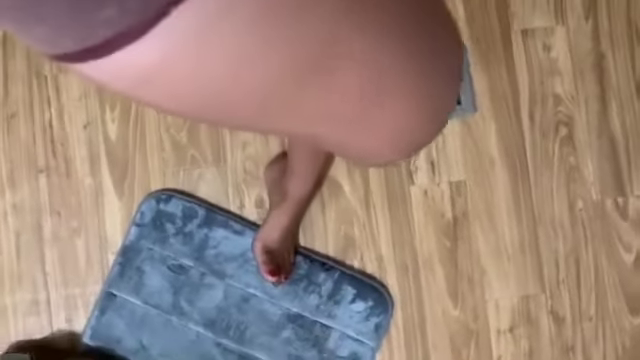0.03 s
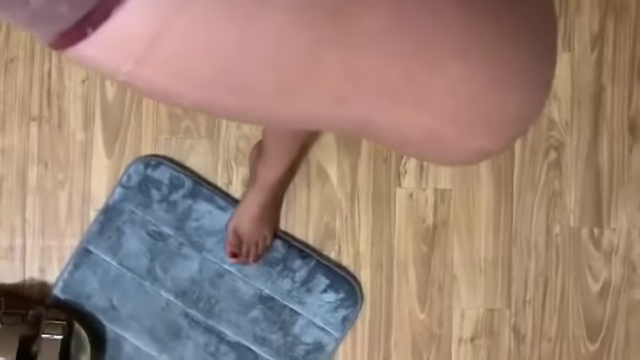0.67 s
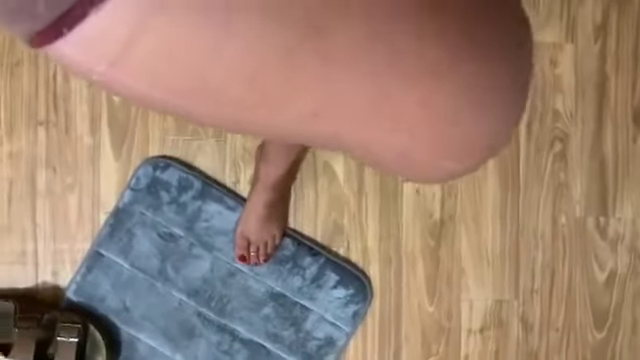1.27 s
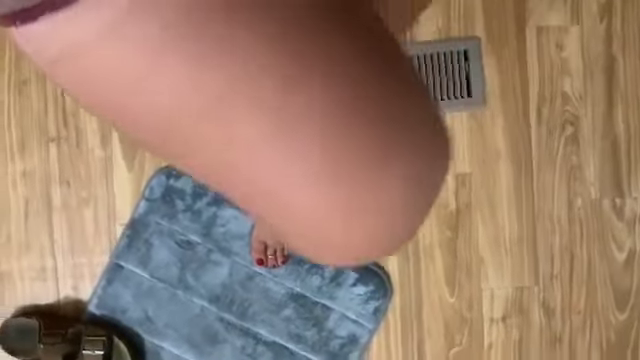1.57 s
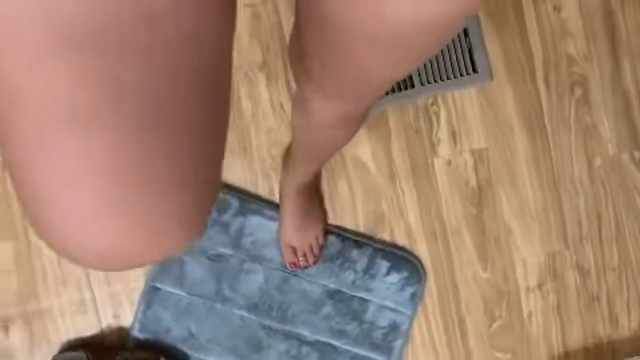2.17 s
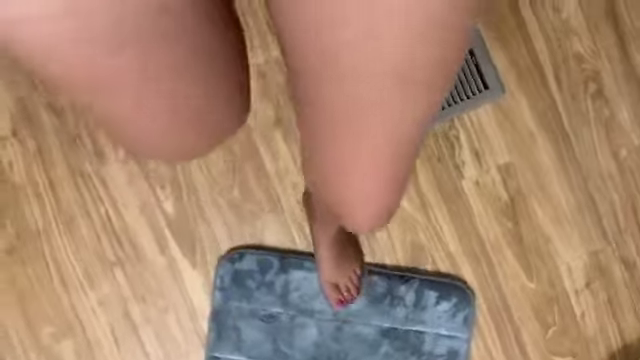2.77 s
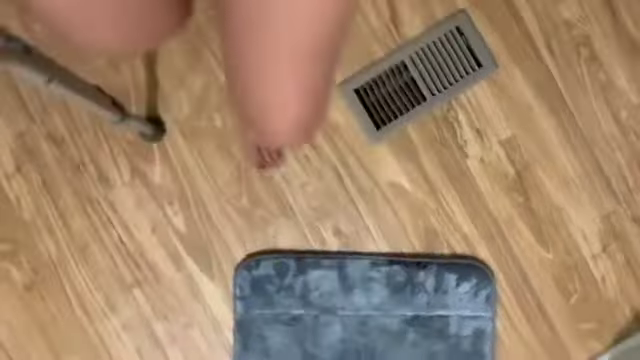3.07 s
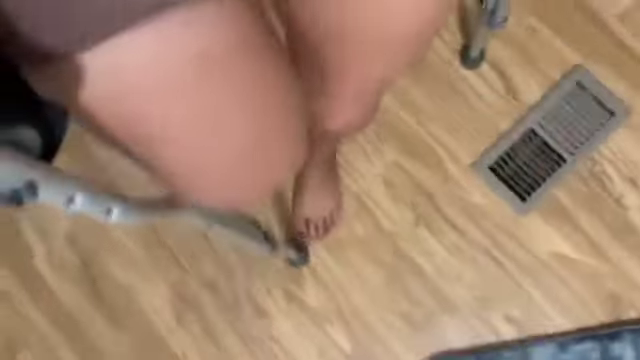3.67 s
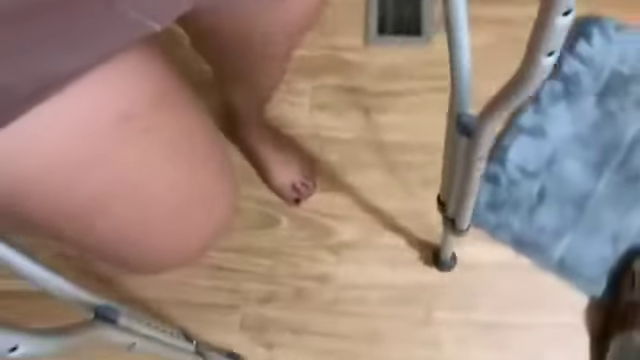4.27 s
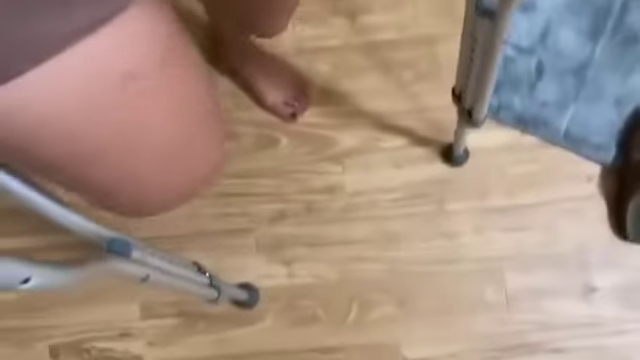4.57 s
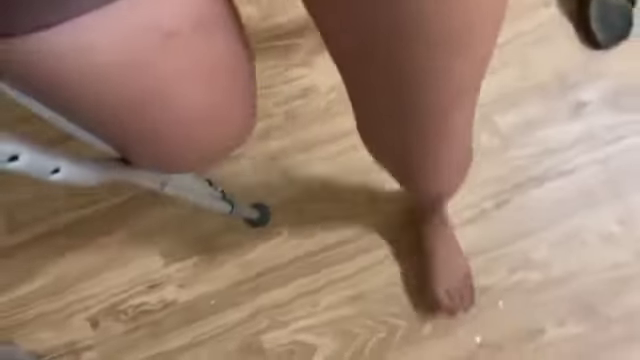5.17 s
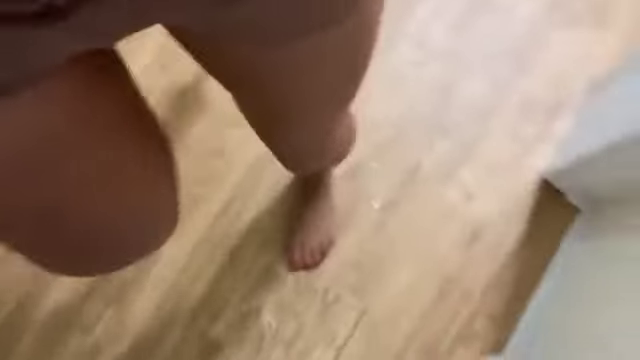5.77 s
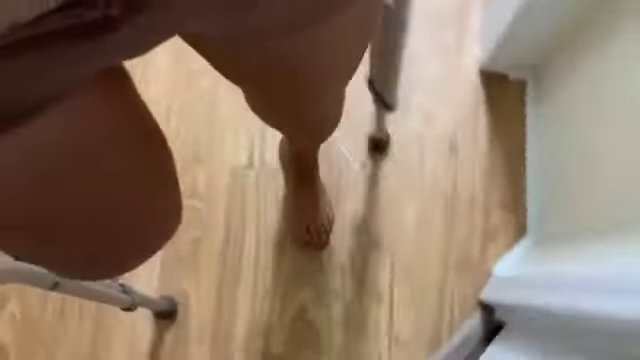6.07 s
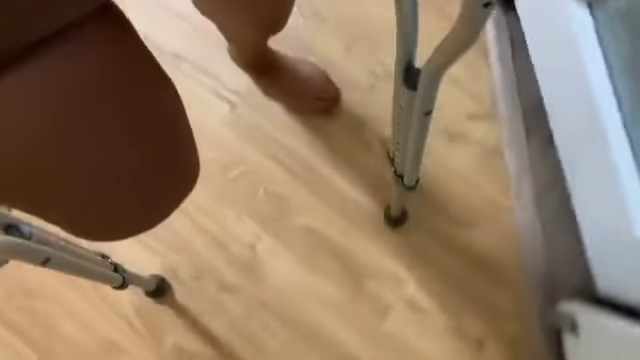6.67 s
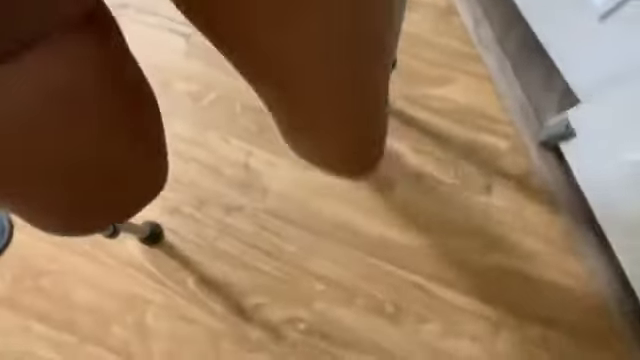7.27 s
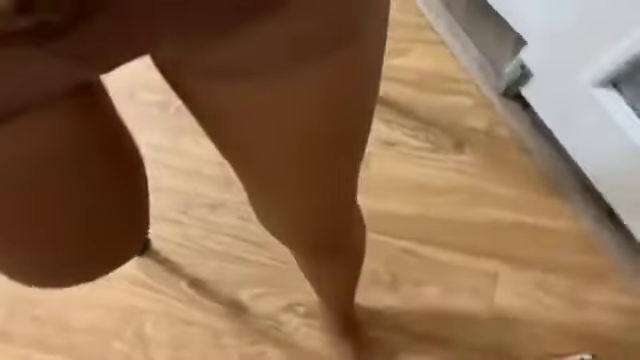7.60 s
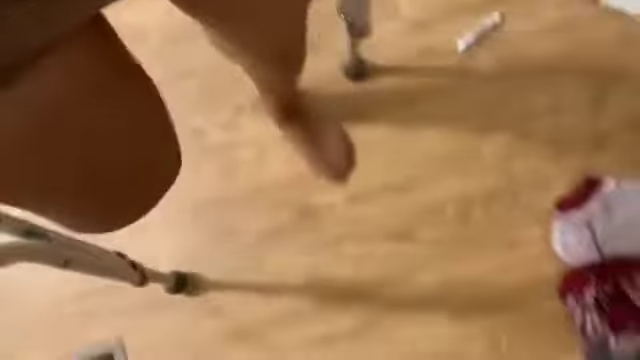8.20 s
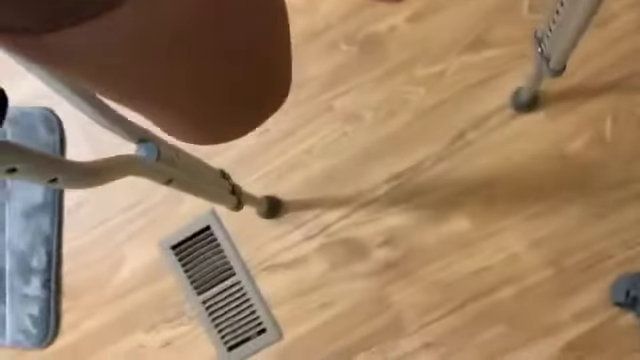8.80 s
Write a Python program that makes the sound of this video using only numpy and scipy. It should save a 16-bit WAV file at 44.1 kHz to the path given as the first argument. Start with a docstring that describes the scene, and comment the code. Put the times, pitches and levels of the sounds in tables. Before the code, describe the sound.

Someone moves on two metal crutches and one bare foot across a laminate floor in a small, hard room. At first there are only faint clothing swishes, a soft thud and small creaks. Then loose tubes clack, rubber tips thump and rattle on the boards, and the foot pats down. Two short high squeaks come in the second half. The microphone is close against the body, over a low ventilation hum.

```python
"""A small hard room with a laminate floor, over a low ventilation hum. Someone hops across it on one bare
foot and two aluminium crutches, heard from a phone held against the body. Clothes swish with each swing
and the pads rub and joints creak under load. The foot and the rubber tips knock on the boards and set
the joists booming; the loose telescoping tubes clack and squeak as they are lifted."""
import sys
import numpy as np
from scipy import signal
from scipy.fft import rfft, irfft, next_fast_len
from scipy.io import wavfile
from scipy.ndimage import uniform_filter1d

SR = 44100
rng = np.random.default_rng(int(sys.argv[2]) if len(sys.argv) > 2 else 0)


def bounce(signal):
    """Save signal as a 16-bit WAV file at the path given by the first command-line argument."""
    frames = np.transpose(np.atleast_2d(signal))
    limited = np.clip(frames, -1, 1)
    pcm = np.round(limited * 32767).astype(np.int16)
    wavfile.write(sys.argv[1], SR, pcm)


N = 389844
TIME = np.arange(N) / SR

# a soft rubber tip, which passes little treble: f/Hz, level/dB
RUBBER_EQ = [(300, 9.5), (2000, -2.5), (3500, -13.5), (7000, -36), (13000, -19)]
# bright rattle of loose joints: f/Hz, level/dB
RATTLE_EQ = [(300, -35), (1200, 8), (2100, 8.5), (3300, 5), (4500, 3), (5600, 3), (7200, 6.5), (9400, -1),
             (11300, -6), (13200, -24)]
# metal on metal: f/Hz, level/dB
METAL_EQ = [(500, 1.5), (1600, 6), (2100, 2.5), (2900, -1.5), (4400, 1.5), (5600, 16), (7000, -20),
            (8400, 15), (9600, -4), (11500, -4), (13500, -14)]
# dry snap of a joint or a fold of cloth: f/Hz, level/dB
SNAP_EQ = [(200, 11), (700, 14.5), (1350, -0.5), (1900, 11.5), (2250, 1.5), (2700, 6.5), (3300, -10.5),
           (6000, -18.5), (9000, -25), (13000, -46)]


def undb(db):
    """Decibels to gain."""
    return 10 ** (np.asarray(db) / 20)


def along(points, hz):
    """Read a curve of (f/Hz, value) points on a log-frequency axis."""
    f, value = np.transpose(points)
    return np.interp(np.log(np.maximum(hz, 1)), np.log(f), value)


def colour(x, eq):
    """Shape a sound with an EQ curve of (f/Hz, level/dB) points."""
    size = next_fast_len(x.shape[-1] + SR // 20)
    gain = undb(along(eq, np.fft.rfftfreq(size, 1 / SR)))
    return irfft(rfft(x, size) * gain, size)[..., :x.shape[-1]]


def unit(x):
    """Scale to rms 1."""
    return x / np.sqrt(np.mean(x ** 2))


def crest(x):
    """Scale a hit so that its loudest 5 ms have rms 1."""
    return x / np.sqrt(uniform_filter1d(x ** 2, size=220).max())


def wander(rate_hz, size=N):
    """Smooth random modulation with a spread near 1."""
    knots = rng.standard_normal(size=8192)
    return 1.24 * np.interp(TIME[:size] * rate_hz, np.arange(len(knots)), knots)


def add(track, s, x):
    """Mix a sound into a track at s seconds."""
    i = int(s * SR)
    track[i:i + len(x)] += x[:max(N - i, 0)]


def contact(decay_ms, eq=None, rise_ms=0.43, grain_db=3):
    """A burst of uneven micro-impacts that builds up and dies away as two surfaces settle."""
    ms = TIME[:SR // 2] * 1e3
    grains = rng.standard_normal(len(ms)) * undb(grain_db * wander(2500, size=len(ms)))
    if eq is not None:
        grains = colour(grains, eq)
    return grains * (1 - np.exp(-(ms / rise_ms) ** 2)) * np.exp(-ms / decay_ms)


def ring(push, modes, detune_share=0.0033):
    """Damped modes driven by a contact; each hit excites them a little differently."""
    t = TIME[:len(push)]
    body = 0
    for hz, t60, db in modes:
        detune, strength_db = rng.standard_normal(2)
        envelope = undb(db + strength_db - 60 * t / t60)
        body = body + envelope * np.cos(2 * np.pi * hz * (1 + detune_share * detune) * t)
    return crest(signal.fftconvolve(push, body)[:len(push)])


def stereo(mid, side):
    """Left and right from mid and side: the bass stays central, the midrange is wide."""
    # stereo width: f/Hz, side minus mid/dB
    width = [(60, -11), (170, -10.5), (360, -6), (660, 0.5), (1200, 1), (2300, 0.5), (3600, -0.5),
             (5000, -2.5), (7200, -2.5), (9500, 8.5), (12000, -6)]
    power_ratio = [(hz, undb(db) ** 2) for hz, db in width]
    mid = colour(mid, [(hz, -10 * np.log10(1 + r)) for hz, r in power_ratio])
    side = colour(side, [(hz, -10 * np.log10(1 + 1 / r)) for hz, r in power_ratio])
    return np.array([mid + side, mid - side])


def room_tail(t60_share):
    """Diffuse ringing of the room, of unit energy; the top end dies first."""
    # reverb time: f/Hz, t60/s
    decay = [(80, 0.44), (250, 0.61), (700, 0.43), (2000, 0.66), (4000, 0.6), (7000, 0.51), (12000, 0.17)]
    t = TIME[:SR * 3 // 4]
    hz = np.fft.rfftfreq(len(t), 1 / SR)
    noise = rfft(rng.standard_normal(len(t)))
    centres = np.geomspace(80, 12000, 9)
    tail = 0
    for f, share in zip(centres, np.eye(len(centres))):
        band = irfft(noise * along(np.c_[centres, share], hz), len(t))
        tail = tail + band * undb(-60 * t / (t60_share * along(decay, f)))
    tail = tail * (1 - np.exp(-t / 0.00086))
    return tail / np.linalg.norm(tail)


def in_room(x, tail_db, t60_share=1):
    """Direct sound, a few near reflections that comb it, then the tail."""
    # reflections off legs, floor and doors: delay/ms, mid gain, side gain
    echoes = [(.35, 0.11, 0.014), (.9, -0.011, -0.25), (2.3, -0.13, 0.056), (4.1, 0.11, 0.75),
              (6.4, 0.15, -0.023), (9.3, -0.23, 0.62), (13.1, 0.23, 0.43)]
    mid, side = (undb(tail_db) * signal.fftconvolve(x, room_tail(t60_share))[:N] for _ in range(2))
    add(mid, 0, 0.74 * x)
    for ms, mid_gain, side_gain in echoes:
        add(mid, ms / 1e3, mid_gain * x)
        add(side, ms / 1e3, side_gain * x)
    return stereo(mid, side)


def ventilation(air_db=-56, hum_hz=81, drift_hz=5, waver_db=4.5):
    """Steady duct air, and a low wavering hum that grows as the walker crosses the room."""
    # rush of duct air: f/Hz, level/dB
    air_eq = [(15, -66), (25, -5.5), (81, 7.5), (130, -2.5), (164, -3.5), (244, -8), (270, -13),
              (361, -11.5), (578, -22.5), (1780, -29.5), (2630, -28.5), (3080, -54.5), (13000, -52)]
    # swell of the hum: t/s, level/dB
    swell = [(0, -92), (3, -67.5), (5, -61.5), (6.5, -57.5), (8.84, -57)]
    air = unit(stereo(*colour(rng.standard_normal((2, N)), air_eq)))
    phase = 2 * np.pi * np.cumsum(hum_hz + drift_hz * wander(15)) / SR
    hum_db = np.interp(TIME, *np.transpose(swell)) + waver_db * wander(12)
    return undb(air_db) * air + undb(hum_db) * np.sqrt(2) * np.sin(phase)


def stroke(start, length, attack_s, release_s):
    """Envelope of one sliding move: it swells smoothly, holds and dies away."""
    swell = .5 + .5 * np.tanh((TIME - start - attack_s) / (2 * attack_s))
    return swell * np.exp(-np.maximum(TIME - start - length, 0) / release_s)


def friction(eq, band_hz, patchy_db, grain_db, slips_per_s=400, slip_db=-3):
    """Fabric catching and letting go: patches of fine grains and sudden slips, rms 1 within band_hz."""
    catch = undb(patchy_db * np.minimum(wander(45), 1.6))
    grains = unit(undb(grain_db * wander(800)) * rng.standard_normal(N))
    slipping = rng.random(N) < slips_per_s / SR
    spread_db = 4 * np.clip(rng.standard_normal(N), -2, 2)
    slips = unit(slipping * undb(spread_db)) * rng.choice([-1, 1], N)
    rub = in_room(colour(catch * (grains + undb(slip_db) * slips), eq), tail_db=-5.5)
    band = signal.sosfilt(signal.butter(4, band_hz, "bandpass", fs=SR, output="sos"), rub)
    return rub / band.std()


def crinkles(per_s=41, spread_db=3, decay_s=0.0025):
    """Folds of cloth snapping at random moments, rms 1."""
    pops = (rng.random(N) < per_s / SR) * undb(spread_db * rng.uniform(-1.7, 1, N))
    envelope = signal.lfilter([1], [1, -np.exp(-1 / (decay_s * SR))], pops)
    bursts = envelope * rng.standard_normal(N)
    return unit(in_room(colour(bursts, SNAP_EQ), tail_db=-13.5))


def clothes(rest_swish_db=-84.5, rest_fibre_db=-86):
    """Loose fabric, never quite at rest, swishes and crinkles with each move while its fibres hiss."""
    # cloth sliding over a limb: t/s, length/s, swish/dB, fibre hiss/dB
    moves = [(0, 0.25, -67, -66), (0.425, 0.2, -68, -67.5), (0.795, 0.034, -76, -100),
             (1.416, 0.14, -69, -64), (1.643, 0.24, -68.5, -74), (1.895, 0.3, -69.5, -72.5),
             (2.713, 0.28, -67, -75), (2.92, 0.22, -64.5, -77), (3.167, 0.16, -69, -75),
             (3.355, 0.096, -62, -82), (3.472, 0.1, -60, -62.5), (3.712, 0.26, -61.5, -65),
             (3.862, 0.062, -50, -53), (4.66, 0.36, -64.5, -70.5), (5.086, 0.33, -58.5, -71.5),
             (5.307, 0.23, -67, -69), (5.701, 0.15, -64, -65.5), (5.883, 0.19, -55.5, -61.5),
             (6.167, 0.066, -60.5, -41.5), (6.285, 0.037, -50.5, -73), (6.67, 0.078, -63.5, -70.5),
             (6.901, 0.14, -58, -58), (7.195, 0.045, -52.5, -68), (7.46, 0.43, -72, -78),
             (8.017, 0.055, -57, -61.5), (8.148, 0.06, -50, -62), (8.597, 0.23, -65.5, -73.5)]
    # body of the swish: f/Hz, level/dB
    swish_eq = [(500, -21), (1400, 4.5), (2300, 4), (3800, 5), (6000, -0.5), (8000, -18), (13000, -43)]
    # airy hiss of the fibres: f/Hz, level/dB
    fibre_eq = [(2500, -6.5), (5000, -4.5), (7800, 2.5), (9600, 3.5), (12600, -1.5), (14000, -21)]
    swish_power, fibre_power = undb(rest_swish_db) ** 2, undb(rest_fibre_db) ** 2
    for s, length, swish_db, fibre_db in moves:
        speed = stroke(s, length, attack_s=0.012, release_s=0.066)
        swish_power = swish_power + (undb(swish_db) * speed) ** 2
        fibre_power = fibre_power + (undb(fibre_db) * speed) ** 2
    swish = friction(swish_eq, band_hz=(1800, 5000), patchy_db=3.5, grain_db=11) + crinkles()
    fibres = friction(fibre_eq, band_hz=(7000, 13000), patchy_db=3, grain_db=-1.5)
    return np.sqrt(swish_power) * swish + np.sqrt(fibre_power) * fibres


def pads(rest_db=-78.5):
    """The crutch pads rub dully on cloth, swelling as the crutches swing."""
    # pads rubbing on cloth as the crutches swing: t/s, length/s, level/dB
    rubs = [(0, 0.2, -66), (1.936, 0.027, -93), (2.685, 0.12, -59.5), (2.99, 0.037, -66),
            (3.31, 0.21, -64.5), (3.718, 0.098, -46.5), (4.678, 0.1, -49.5), (4.874, 0.076, -50.5),
            (5.602, 0.092, -56), (5.715, 0.23, -49), (6.158, 0.34, -63), (6.686, 0.035, -53.5),
            (7.052, 0.084, -47.5), (7.227, 0.057, -57), (7.76, 0.028, -62), (7.985, 0.15, -49),
            (8.673, .17, -56.5)]
    # muffled rub of pad on cloth: f/Hz, level/dB
    rub_eq = [(25, -36), (60, 5), (130, -7), (330, -7.5), (520, -4), (800, -1.5), (1100, -6), (1500, -13),
              (3000, -25), (8000, -62)]
    power = undb(rest_db) ** 2
    for s, length, db in rubs:
        power = power + (undb(db) * stroke(s, length, attack_s=0.011, release_s=0.12)) ** 2
    return np.sqrt(power) * friction(rub_eq, band_hz=(400, 1300), patchy_db=4, grain_db=2.5)


def snaps(events, eq, decay_ms, tail_db):
    """Tiny contacts close to the phone, with no ring of their own."""
    out = np.zeros(N)
    for s, db in events:
        add(out, s, undb(db) * crest(contact(decay_ms, eq)))
    return in_room(out, tail_db)


def ticks():
    """Grips and clothes give off small bright ticks."""
    # ticks: t/s, level/dB
    hits = [(.088, -67), (0.457, -49), (1.453, -51.5), (2.054, -60), (2.085, -64), (3.573, -49.5),
            (3.725, -56), (3.885, -36.5), (3.897, -44.5), (5.916, -50), (6.149, -52), (6.181, -44),
            (6.237, -43.5), (7.463, -52.5), (7.611, -55.5), (7.705, -69), (7.885, -46.5), (8.040, -38)]
    return snaps(hits, RATTLE_EQ, decay_ms=3, tail_db=-7.5)


def light_knock():
    """One light dry knock, close up."""
    # the knock: t/s, level/dB
    hits = [(1.203, -43.5)]
    # its boxy tone: f/Hz, level/dB
    knock_eq = [(150, -7), (600, 12), (1300, -5), (2200, -5), (3500, -31), (9000, -25), (13000, -38)]
    return snaps(hits, knock_eq, decay_ms=2.6, tail_db=-8)


def creaks(ring_db=-4):
    """A crutch joint under load slips in dry snaps, each with a brief ring."""
    # slips of the joint: t/s, level/dB
    slips = [(0.089, -52.5), (1.950, -57.5), (2.155, -56.5), (2.194, -58.5), (2.277, -60.5), (2.318, -57.5),
             (2.370, -55.5), (2.41, -58.5), (2.462, -52.5), (2.534, -59.5), (2.575, -54.5), (2.707, -58),
             (2.736, -56), (2.783, -51.5), (2.815, -56), (2.836, -51), (2.858, -59), (2.973, -53),
             (3.016, -49.5), (3.052, -51), (3.066, -54), (3.353, -54.5), (3.414, -51.5), (6.323, -53),
             (7.783, -54), (8.666, -48)]
    # modes of the joint: f/Hz, t60/s, level/dB
    joint_modes = [(1900, 0.008, -8), (2300, 0.0062, 1.5), (2665, 0.017, -5)]
    out = np.zeros(N)
    for s, db in slips:
        snap = crest(contact(3.4, SNAP_EQ))
        joint = ring(contact(1.34), joint_modes, detune_share=0.03)
        add(out, s, undb(db) * (snap + undb(ring_db) * joint))
    return in_room(out, tail_db=-2)


def squeaks(scoop_ms=6, harmonics_db=(0, 1, -6), skip_db=-20, rasp_db=-26, chatter_db=4):
    """Tube sticks and slips in tube: the pitch scoops up to the tube's note, jitters and chatters."""
    # slides: t/s, final f/Hz, scoop/share of f, level/dB, length/ms, roughness, tilt/dB per harmonic
    slides = [(6.361, 3395, 0.17, -40.5, 10.4, 0.3, 2), (6.3725, 3513, 0.03, -24.5, 6.7, 0.3, -1),
              (6.385, 3450, 0, -34.5, 15.2, 0.54, -8), (6.501, 3510, 0.56, -55, 7, 0.4, 13),
              (8.198, 3450, 0.23, -35, 17, 0.5, -2), (8.209, 3600, 0.05, -27.5, 8.6, 1.16, 0.5),
              (8.221, 3585, 0, -30.5, 21, 0.94, -0.5), (8.232, 3508, 0.06, -38.5, 52, 0.2, -5)]
    out, t_ms = np.zeros(N), TIME[:SR // 4] * 1e3
    for s, hz, scoop, db, length_ms, rough, tilt_db in slides:
        jitter = rough * 0.036 * unit(uniform_filter1d(rng.standard_normal(len(t_ms)), size=45))
        pitch_hz = hz * (1 - scoop * np.exp(-t_ms / scoop_ms) + jitter)
        phase = 2 * np.pi * np.cumsum(pitch_hz) / SR
        # overtones come in as the slipping locks onto the note
        locked = 1 - np.exp(-t_ms / scoop_ms / 2) * np.clip(6 * scoop, 0, 1)
        tone = sum(undb(harmonic_db) * (undb(tilt_db) * locked) ** (k - 1) * np.sin(k * phase)
                   for k, harmonic_db in enumerate(harmonics_db, 1))
        # in a rough slide every other slip is weaker, which sounds between the note and its octave
        skipping = undb(skip_db) * locked * np.sin(1.5 * phase)
        rasp = undb(rasp_db) * unit(colour(rng.standard_normal(len(t_ms)), METAL_EQ))
        swell = np.sin(np.pi * np.minimum(t_ms / length_ms, 1))
        chatter = undb(chatter_db * wander(511, size=len(t_ms)))
        squeal = tone + rough ** 2 * skipping + rough * rasp
        add(out, s, undb(db) * crest(swell * chatter * squeal))
    return in_room(out, tail_db=-4.5, t60_share=0.84)


def clacks(frame_hz=257.4, frame_t60_s=0.58):
    """A lifted crutch drops onto its pin: a hard crack, the tubes ring and the bending frame hums."""
    # slack tubes hitting their pins: t/s, tube ring/dB, crack/dB, frame hum/dB, rise/ms, decay/ms
    hits = [(4.012, -34.5, -23, -39, 1.3, 1.74), (4.026, -33, -33.5, -44.5, 4.8, 2),
            (4.046, -34, -49, -66, 2.1, 8), (5.997, -47, -47, -65, 6.3, 4.4),
            (6.006, -32, -34.5, -64, 3, 2.7)]
    # modes of the aluminium tubes: f/Hz, t60/s, level/dB
    tube_modes = [(430, 0.09, -12), (850, 0.026, -4.5), (1310, 0.11, -11.5), (1660, 0.02, -16),
                  (2540, 0.027, -13.5), (2805, 0.073, -0.5), (2930, 0.037, 5.5), (3021, 0.06, -1.5),
                  (3320, 0.05, -4), (3540, 0.053, -4), (4090, 0.04, -10.5), (5040, 0.03, -12),
                  (5570, 0.044, 0), (5860, 0.038, -0.5), (6130, 0.025, 0), (6620, 0.049, -2)]
    metal, hum = np.zeros((2, N))
    t = TIME[:SR // 2]
    frame = np.sin(2 * np.pi * frame_hz * t) * undb(-60 * t / frame_t60_s)
    for s, ring_db, crack_db, frame_db, rise_ms, decay_ms in hits:
        tubes = ring(contact(decay_ms, rise_ms=rise_ms), tube_modes, detune_share=0.0026)
        crack = crest(contact(decay_ms, METAL_EQ, rise_ms))
        add(metal, s, undb(ring_db) * tubes + undb(crack_db) * crack)
        add(hum, s, undb(frame_db) * frame)
    return in_room(metal, tail_db=-5, t60_share=0.9) + hum  # the hum stays dry and central


def thud(decay_ms, pitch_hz, push_ms=1, settling_db=-26, fall_db_per_octave=18):
    """Weight arriving on the floor: each spot favours the modes of the joists near one pitch."""
    # modes of the floor on its joists: f/Hz, t60/s, level/dB
    joist_modes = [(84.6, 0.12, -2.5), (151.7, 0.11, -1.5), (165.6, 0.057, 1.5), (222.5, 0.11, -3.5),
                   (255, 0.11, 6), (290.6, 0.089, 1), (360, 0.16, 5.5)]
    age = TIME[:SR // 2] * 1e3 / push_ms
    push = age * np.exp(-age)
    settling = crest(signal.fftconvolve(contact(decay_ms), push)[:len(push)])
    modes = [(hz, t60, db - fall_db_per_octave * abs(np.log2(hz / pitch_hz)))
             for hz, t60, db in joist_modes]
    boom = ring(push + undb(settling_db) * settling, modes)
    return crest(signal.sosfilt(signal.butter(2, [55, 450], "bandpass", fs=SR, output="sos"), boom))


def bare_foot(flatten_ms=30):
    """The sole pats the laminate and thumps hollowly as it flattens, while the soft heel thuds."""
    # the foot landing and rolling: t/s, thud/dB, thud f/Hz, sole thump/dB, skin pat/dB, decay/ms
    landings = [(1.590, -40.5, 84, -48, -82, 13), (4.993, -47.5, 172, -66, -72, 4.8),
                (5.262, -58, 91, -54, -37.5, 6.1), (5.279, -61, 150, -58, -43, 3.6),
                (5.298, -51.5, 151, -63, -36.5, 13), (5.324, -52, 170, -53, -34.5, 11.7),
                (7.245, -43, 224, -54, -61, 30), (7.307, -42, 211, -51.5, -52, 7.5),
                (8.037, -53, 149, -61, -53, 2.6)]
    # hollow thump of the sole: f/Hz, level/dB
    sole_eq = [(100, -34), (220, 2.5), (400, -1.5), (560, -9), (850, -15), (2500, -48)]
    # pat of bare skin: f/Hz, level/dB
    skin_eq = [(150, -10), (700, -1), (1400, -4), (2200, -2.5), (3500, -10.5), (6000, -14.5), (9000, -14.5),
               (13000, -42)]
    out = np.zeros(N)
    for s, thud_db, thud_hz, sole_db, pat_db, decay_ms in landings:
        add(out, s, undb(thud_db) * thud(decay_ms, thud_hz))
        add(out, s, undb(sole_db) * crest(colour(contact(flatten_ms, rise_ms=1), sole_eq)))
        add(out, s, undb(pat_db) * crest(contact(decay_ms, skin_eq, rise_ms=0.52, grain_db=5)))
    return in_room(out, tail_db=-6)


def tip_taps(t60_s=0.041, upper_ratio=1.4):
    """A tip set down lightly sounds the woody note of a single board."""
    # light touches: t/s, board f/Hz, level/dB, upper mode against the note/dB
    touches = [(3.582, 643, -43.5, -22), (4.190, 844, -38.5, -3)]
    out = np.zeros(N)
    for s, hz, db, upper_db in touches:
        modes = [(hz, t60_s, 0), (hz * upper_ratio, t60_s, upper_db)]
        add(out, s, undb(db) * ring(contact(3.3, RUBBER_EQ, rise_ms=1.8), modes))
    return in_room(out, tail_db=-9.5)


def tip_landings(joints_db=-3, pins_db=-4):
    """A rubber tip thumps the floor, knocks the board under it and rattles the tube above."""
    # crutch tips landing: t/s, thud/dB, thud f/Hz, board knock/dB, rattle/dB, decay/ms
    landings = [(3.645, -41, 342, -48.5, -76, 1.6), (4.383, -80, 150, -50.5, -98, 2.3),
                (4.551, -64, 200, -38.5, -45, 4.4), (4.561, -34.5, 250, -31.5, -29.5, 3.9),
                (4.567, -32, 155, -40.5, -45, 5.8), (4.581, -29.5, 135, -36.5, -37, 5.8),
                (4.603, -30.5, 93, -41.5, -44, 3.9), (4.636, -47, 110, -49, -42, 2.5),
                (5.975, -33.5, 143, -55, -46, 12), (6.903, -37, 210, -25, -31.5, 2.27),
                (6.944, -33.5, 194, -35, -49, 2.4), (8.580, -70, 150, -51, -68, 1.8),
                (8.790, -50, 250, -34, -32.5, 7.2), (8.801, -38, 260, -26.5, -23, 3.2),
                (8.806, -28, 149, -31, -24, 2), (8.817, -33.5, 254, -47, -51, 1.6)]
    # modes of the laminate boards: f/Hz, t60/s, level/dB
    board_modes = [(374, 0.03, -22.5), (470, 0.02, 1), (620, 0.02, 5.5), (744, 0.068, 4), (837, 0.022, 13),
                   (1010, 0.02, 2), (1225, 0.008, 7.5), (1510, 0.03, 5.5), (1870, 0.019, 11),
                   (2260, 0.0087, -4.5), (2616, 0.027, 10)]
    # modes of the crutch's spring pins: f/Hz, t60/s, level/dB
    pin_modes = [(2153, 0.02, -2.5), (2267, 0.017, -4), (5380, 0.014, -3), (6250, 0.013, -3),
                 (6880, 0.0096, -2), (7380, 0.022, -4), (8380, 0.022, -4.5)]
    thuds, clatter = np.zeros((2, N))
    for s, thud_db, thud_hz, knock_db, rattle_db, decay_ms in landings:
        rise_ms = 0.8 * decay_ms  # rubber builds up its push gradually
        add(thuds, s, undb(thud_db) * thud(decay_ms, thud_hz))
        knock = ring(contact(decay_ms, RUBBER_EQ, rise_ms), board_modes, detune_share=0.013)
        joints = crest(contact(decay_ms, RATTLE_EQ, rise_ms))
        pins = ring(contact(decay_ms, rise_ms=rise_ms), pin_modes, detune_share=0.011)
        rattle = undb(joints_db) * joints + undb(pins_db) * pins
        add(clatter, s, undb(knock_db) * knock + undb(rattle_db) * rattle)
    return in_room(thuds, tail_db=-5) + in_room(clatter, tail_db=-5)


def scene():
    """Crutches and foot in front, over a bed of cloth and ventilation, in stereo."""
    crutches = tip_landings() + tip_taps() + clacks() + squeaks() + creaks()
    small_sounds = ticks() + light_knock()
    return crutches + bare_foot() + small_sounds + pads() + clothes() + ventilation()


def record(dry):
    """The phone cuts the top steeply above 13.3 kHz."""
    return signal.sosfilt(signal.ellip(10, .2, 70, 13300, fs=SR, output="sos"), dry)


dry = scene()
out = record(dry)
bounce(out)
```